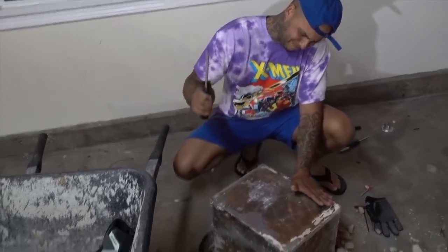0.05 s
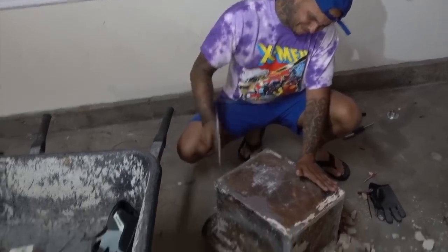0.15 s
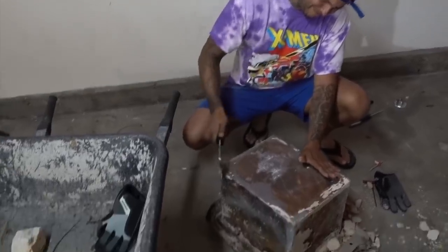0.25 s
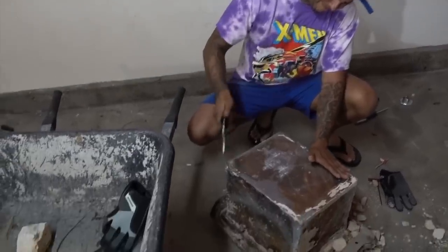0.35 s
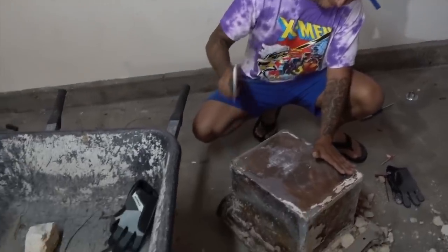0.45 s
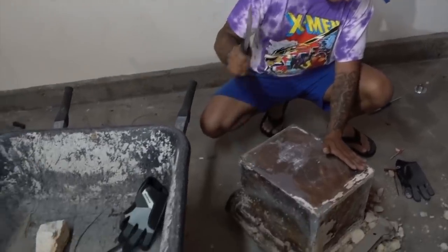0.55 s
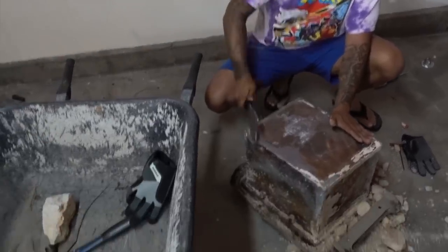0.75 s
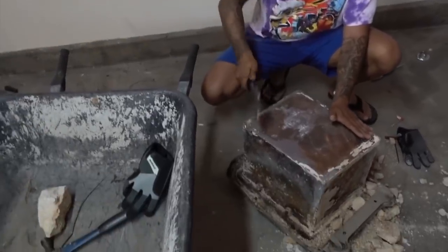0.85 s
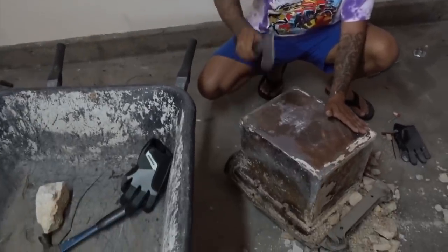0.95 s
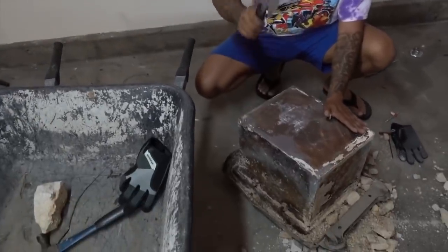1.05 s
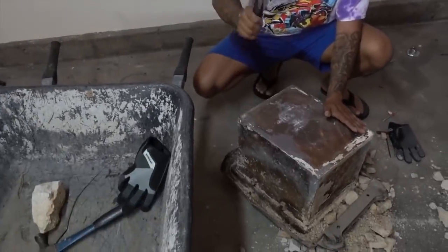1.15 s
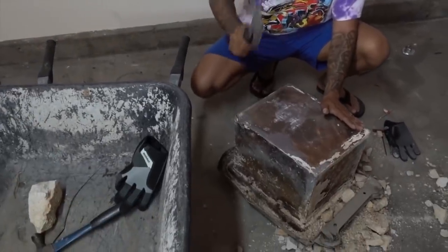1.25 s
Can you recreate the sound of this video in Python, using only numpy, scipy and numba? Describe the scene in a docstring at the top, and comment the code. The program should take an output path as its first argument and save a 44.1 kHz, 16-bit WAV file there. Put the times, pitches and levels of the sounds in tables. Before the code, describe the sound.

Heavy hammer blows on a chisel against a steel safe, echoing in a bare garage

```python
"""Hammer blows on a chisel set in the seam of a steel safe, ringing on in a bare, hard-walled garage.
Each blow is a noisy clatter and crack, a dull thud of damped safe and air modes and a faint chisel ring.
Noise swelling and dying band by band makes the echo; fainter rattles of steel follow two of the blows.
The place is heard by a phone's two close microphones, with far more echo than direct clatter.
The phone's limiter holds the loud first part of each blow nearly flat until the echo sinks below its ceiling."""
import sys
import numpy as np
from scipy import signal
from scipy.fft import rfft, irfft
from scipy.io import wavfile
from scipy.ndimage import uniform_filter1d, minimum_filter1d
from numba import njit

SR = 44100
rng = np.random.default_rng(int(sys.argv[2]) if len(sys.argv) > 2 else 0)


def bounce(signal):
    """Save signal as a 16-bit WAV file at the path given by the first command-line argument."""
    frames = np.transpose(np.atleast_2d(signal))
    limited = np.clip(frames, -1, 1)
    pcm = np.round(limited * 32767).astype(np.int16)
    wavfile.write(sys.argv[1], SR, pcm)


def undo_db(level):
    """Turn decibels back into plain size, where 20 dB means ten times bigger."""
    steps = np.asarray(level, float) / 20
    return 10 ** steps


N = 57330  # samples, 1.3 s

# Hammer blows; the first falls before the start and only its echo is left: (time [s], level [dB],
# crack [dB], thud [dB], ring [dB], brightness [dB per octave about 1 kHz], rise of the contact [s],
# mode that the blow favours [Hz])
BLOWS = [(-.30, -2, -2, -2, 6, 0.5, 0.006, 190), (0.2244, -3, -12, 0, -4, -0.12, 0.015, 186),
         (0.7502, -4, 9, -1, 3, 0.44, 0.0011, 224)]
# The steel rattles afresh shortly after a blow: (time [s], level [dB], brightness [dB per octave])
REBOUNDS = [(.259, -16, 3), (.31, -16.5, 1), (.80, -13, 1.5), (.875, -20, -0.36)]
# Colour of clatter and echo: (frequency [Hz], relative density [dB per Hz])
BLOW_COLOUR = [(24, -23), (40, -27), (219, -1), (305, -7), (406, -8.5), (446, -6), (1320, -10), (4210, -23),
               (10600, -31.5), (11400, -36), (14800, -97), (22000, -120)]
# Low modes of the safe and the garage air: (frequency [Hz], relative level [dB], 60 dB decay [s])
THUD_MODES = [(85, -16, 0.94), (164.4, -1.5, 0.62), (186, -1, 0.57), (224, -0.5, 0.64), (270.6, -6, 0.94),
              (325.3, -17.5, 1), (419.2, -2.5, 0.78), (548, -13, 0.74), (683, -9.5, 0.89)]
# Modes of chisel and steel plate: (frequency [Hz], relative level [dB], 60 dB decay [s])
RING_MODES = [(926, -4, .5), (1144, -2, .45), (1183, -2, .45), (1342, -1, .45), (1640, -4, .45),
              (2020, -4, .45), (4175, -8, .42), (4269, -6, .5)]
# Echo of the garage: (frequency [Hz], 60 dB decay [s], time to build up [s])
ROOM = [(60, 0.68, 0.013), (151, 0.63, 0.024), (370, 0.68, 0.038), (930, 0.59, 0.04), (2430, 0.63, 0.007),
        (4630, 0.56, 0.013), (8100, 0.45, 0.027), (11400, 0.39, 0.041)]
# Difference between two close microphones: (frequency [Hz], gain on the side signal [dB])
SIDE_GAIN = [(30, -8), (70, -16), (150, -20), (300, -12), (600, -8.5), (1200, -7), (2400, -6), (5000, -1.5),
             (10000, .5)]
# Background of the garage: (frequency [Hz], relative density [dB per Hz])
FLOOR = [(40, -22), (100, -5), (250, 27), (600, -3), (1500, -22), (4000, -26), (11000, -38)]

LEAD_S = 0.5  # time run ahead of the start, for the first blow
LOUD_DB, PAN_DB = -4, -1  # overall level of the blows; left over right
DIRECT_DB, BODY_T60_S = -19, 0.055  # clatter of the steel, energy against the echo
CRACK_HZ, CRACK_WIDTH_HZ, CRACK_T60_S, CRACK_DB = 3700, 1900, 0.007, -9.5  # dB against the clatter
THUD_DB, THUD_RISE_S, THUD_WAVER_HZ = -5, 0.0022, 4.2
FAVOUR_DB, FAVOUR_OCTAVES = 5, 0.18  # lift and reach around the favoured mode
RING_DB, RING_RISE_S, RING_WAVER_HZ = -13, 0.002, 4.6
ROOM_BUILD_S, SIDE_BUILD_S = 0.0027, 0.03
PATCHY_DB, PATCH_S = 0.5, 0.004  # uneven arrival of the reflections
FLOOR_DB = -60  # rms
CEILING_DB, RATIO, ATTACK_S, RELEASE_S = -5.5, 9, 0.0003, 0.016  # limiter
TOP_HZ = 10930


def blow(t, crack_db, thud_db, ring_db, tilt_db, contact_s, favour_hz):
    """One hammer blow as mid and side: direct contact noise, ringing bodies and the answer of the room."""
    direct = clatter(t, tilt_db, contact_s) + crack(t, crack_db)
    # Modes drawn separately for mid and side surround the microphones
    thud_mid, thud_side = (thud(t, thud_db, favour_hz) for _ in range(2))
    ring_mid, ring_side = (ring(t, ring_db) for _ in range(2))
    echo_mid, echo_side = (level(paint(echo(t, build_s), tilt_db), 0)
                           for build_s in (ROOM_BUILD_S + contact_s, SIDE_BUILD_S))
    mid = direct + echo_mid + thud_mid + ring_mid
    direct_side = undo_db(-6.5) * np.roll(direct, 9)  # 9 samples later
    side = colour(echo_side + thud_side + ring_side + direct_side, SIDE_GAIN)
    return np.array([mid, side])


def clatter(t, tilt_db, contact_s):
    """Noisy clatter of the steel: broadband noise that rises with the contact and soon dies."""
    noise = rng.standard_normal(len(t)) * fade(t, contact_s, BODY_T60_S)
    return level(paint(noise, tilt_db), DIRECT_DB)


def crack(t, crack_db):
    """Sharp crack of hammer on chisel: a very short burst of band-limited noise."""
    edges = [CRACK_HZ - CRACK_WIDTH_HZ / 2, CRACK_HZ + CRACK_WIDTH_HZ / 2]
    band = signal.butter(3, edges, "band", fs=SR, output="sos")
    burst = rng.standard_normal(len(t)) * fade(t, 0.00046, CRACK_T60_S)
    return level(signal.sosfilt(band, burst), DIRECT_DB + CRACK_DB + crack_db)


def thud(t, thud_db, favour_hz):
    """Dull thud: low modes of safe and air, those near the favoured one driven harder."""
    body = []
    for hz, db, t60 in THUD_MODES:
        octaves = np.log2(hz / favour_hz)
        lift = FAVOUR_DB * np.exp(-(octaves / FAVOUR_OCTAVES) ** 2)
        body.append((hz, db + lift, t60))
    return level(modes(body, t, THUD_RISE_S, THUD_WAVER_HZ), THUD_DB + thud_db)


def ring(t, ring_db):
    """Faint ring: the damped higher modes of chisel and steel plate."""
    return level(modes(RING_MODES, t, RING_RISE_S, RING_WAVER_HZ), RING_DB + ring_db)


def modes(table, t, rise_s, waver_hz):
    """Damped tones with new phases and sizes at each blow, wavering in pitch."""
    out = 0
    for hz, db, t60 in table:
        drift = wander(len(t), int(0.0274 * SR))
        phase = 2 * np.pi * (np.cumsum(hz + waver_hz * drift) / SR + rng.random())
        size = undo_db(db + 0.5 * rng.standard_normal())
        out = out + size * fade(t, rise_s, t60) * np.sin(phase)
    return out


def echo(t, build_s):
    """Dense reflections: noise in uneven bunches whose bands swell and die at their own rates."""
    bunch = wander(len(t), int(PATCH_S * SR))
    noise = rng.standard_normal(len(t)) * undo_db(PATCHY_DB * bunch)
    hz, when, bands = signal.stft(noise, SR, nperseg=256)
    room = np.array(ROOM)
    t60 = curve(room[:, [0, 1]], hz)[:, None]
    rise = curve(room[:, [0, 2]], hz)[:, None]
    tail = signal.istft(bands * fade(when + 0.01, rise, t60), SR, nperseg=256)[1][:len(t)]
    return level(tail, 0) * (1 - np.exp(-t / build_s))


def garage():
    """Quiet steady background of the place: coloured noise, separate in mid and side."""
    mid, side = (level(colour(rng.standard_normal(N), FLOOR), FLOOR_DB) * np.sqrt(N) for _ in range(2))
    return np.array([mid, colour(side, SIDE_GAIN)])


def paint(x, tilt_db):
    """Colour of a blow, tilted about 1 kHz by its brightness in dB per octave."""
    tilt = [(1000 / 2 ** 4, -4 * tilt_db), (1000 * 2 ** 4, 4 * tilt_db)]
    return colour(colour(x, BLOW_COLOUR), tilt)


def colour(x, table):
    """Filter by a (frequency [Hz], gain [dB]) table with a causal response from the cepstrum."""
    size = 4096
    log_gain = curve(table, np.arange(size // 2 + 1) * SR / size) * np.log(10) / 20
    ceps = irfft(log_gain)
    ceps[1:size // 2] *= 2  # fold onto positive times: minimum phase
    ceps[size // 2 + 1:] = 0
    response = irfft(np.exp(rfft(ceps)))
    return signal.fftconvolve(x, response)[:len(x)]


def curve(table, hz):
    """Read a table on a log-frequency axis."""
    table = np.array(table, float)
    return np.interp(np.log(np.maximum(hz, 1)), np.log(table[:, 0]), table[:, 1])


def level(x, db):
    """Scale to a total energy."""
    return x * undo_db(db) / np.sqrt(np.sum(x ** 2))


def fade(t, rise_s, t60_s):
    """Exponential rise, times a fall by 60 dB in t60."""
    return (1 - np.exp(-t / rise_s)) * np.exp(-np.log(1000) * t / t60_s)


def wander(n, k):
    """Random values k samples apart, joined by straight lines."""
    steps = np.repeat(rng.standard_normal(n // k + 1), k)
    return uniform_filter1d(steps, k)[:n]


def scene():
    """Blows and rebounds over the background, as left and right."""
    lead = int(LEAD_S * SR)
    t = np.arange(int(1.2 * SR)) / SR
    rebounds = [(s, db, -10, -12, -6, tilt_db, 0.002, 412) for s, db, tilt_db in REBOUNDS]
    out = np.zeros((2, lead + N + len(t)))
    for s, db, *kind in BLOWS + rebounds:
        i = lead + int(s * SR)
        gain = undo_db(LOUD_DB + db) * np.sqrt(SR / 20)  # unit energy taken as 50 ms of sound
        out[:, i:i + len(t)] += blow(t, *kind) * gain
    mid, side = out[:, lead:lead + N] + garage()
    return np.array([(mid + side) * undo_db(PAN_DB / 2), (mid - side) * undo_db(-PAN_DB / 2)])


@njit
def follow(x, attack, release):
    """Envelope that rises fast and falls slowly."""
    e, out = 0., np.empty(len(x))
    for i in range(len(x)):
        e += (x[i] - e) * (attack if x[i] > e else release)
        out[i] = e
    return out


def limiter(x):
    """Look-ahead limiter: one gain for both channels, set by the louder, squeezes what tops the ceiling."""
    ahead = int(0.006 * SR)
    peak = -minimum_filter1d(-np.abs(x).max(axis=0), size=2 * ahead + 1)
    env = follow(peak, 1 / (ATTACK_S * SR), 1 / (RELEASE_S * SR))
    ceiling = undo_db(CEILING_DB)
    return x * (ceiling / np.maximum(env, ceiling)) ** (1 - 1 / RATIO)


def band_limit(x):
    """A steep low-pass at the top of the band."""
    return signal.sosfilt(signal.butter(12, 11510, fs=SR, output="sos"), x)


def record(dry):
    """The phone: its limiter, then a steep cut of the top."""
    low_pass = signal.ellip(10, 0.2, 70, TOP_HZ, fs=SR, output="sos")
    mix = signal.sosfilt(low_pass, limiter(dry))
    return band_limit(mix)


dry = scene()
out = record(dry)
bounce(out)
```